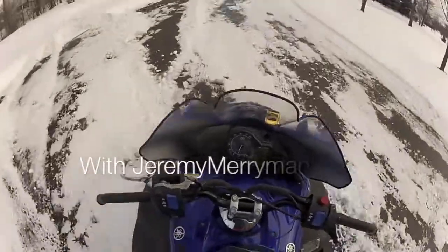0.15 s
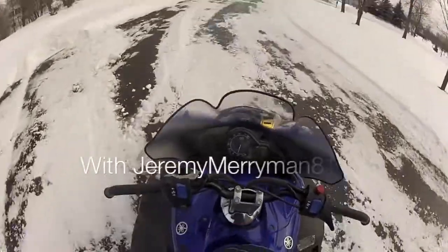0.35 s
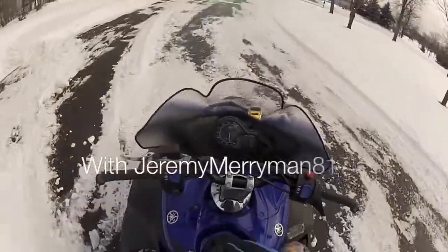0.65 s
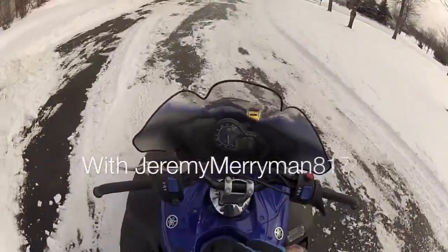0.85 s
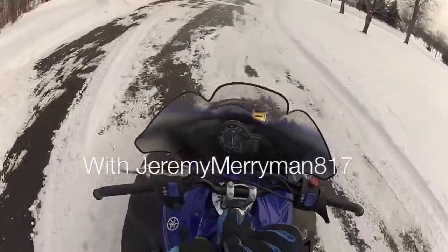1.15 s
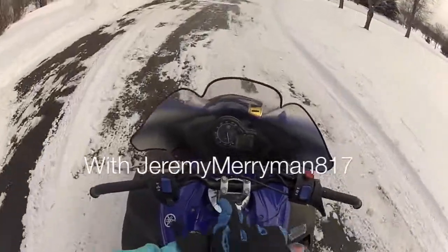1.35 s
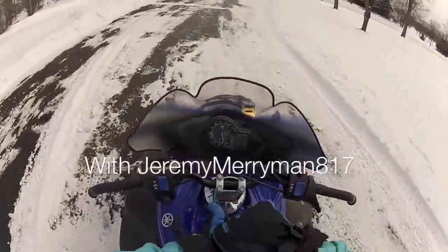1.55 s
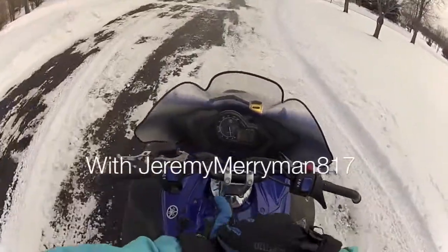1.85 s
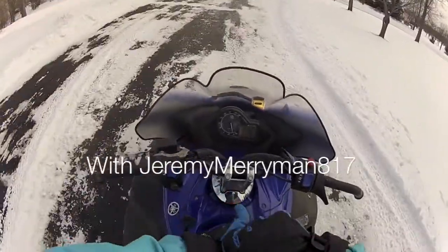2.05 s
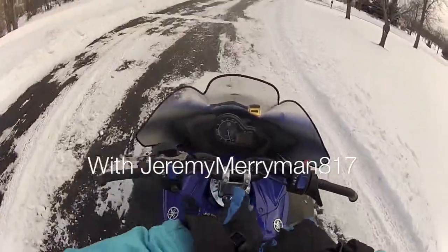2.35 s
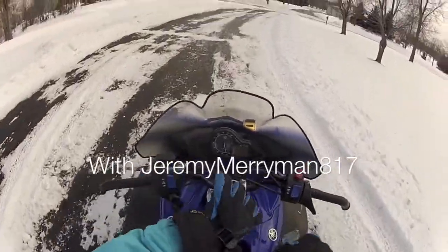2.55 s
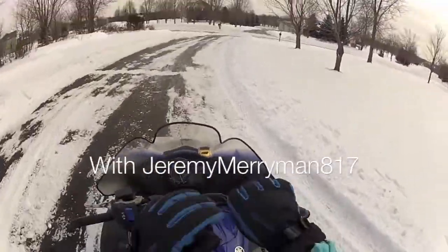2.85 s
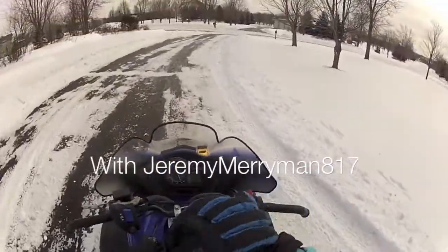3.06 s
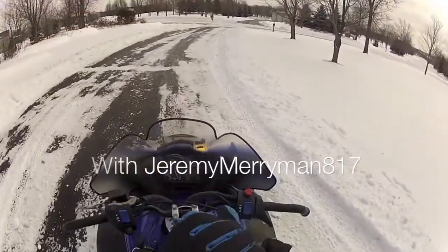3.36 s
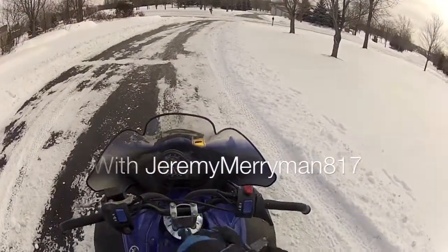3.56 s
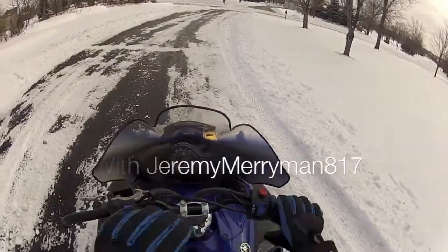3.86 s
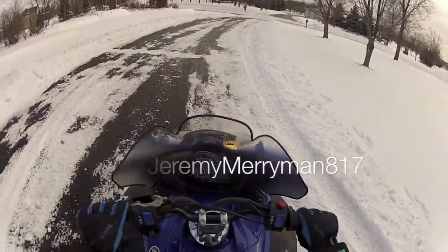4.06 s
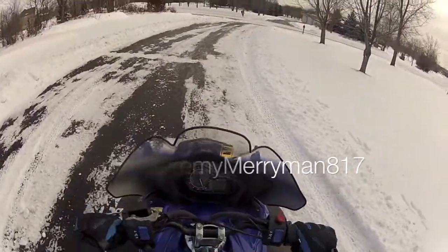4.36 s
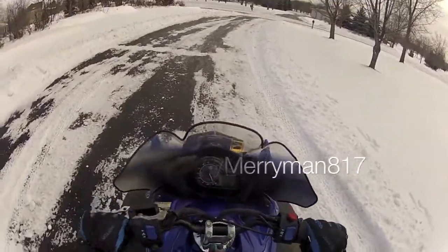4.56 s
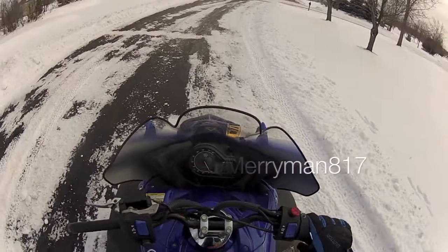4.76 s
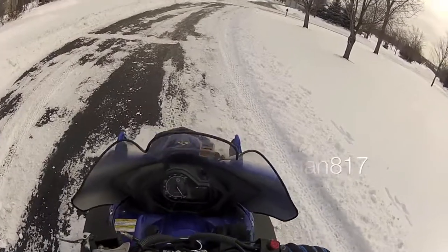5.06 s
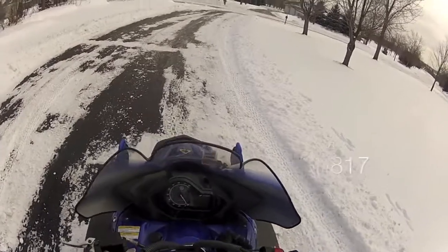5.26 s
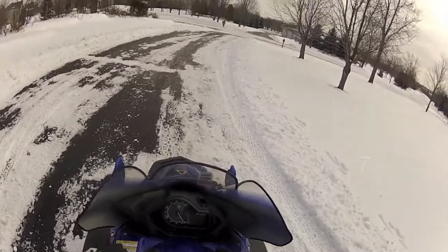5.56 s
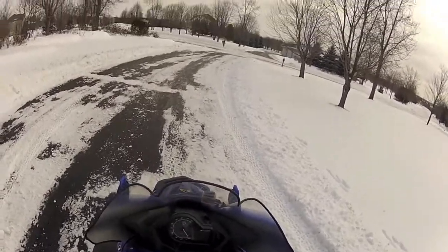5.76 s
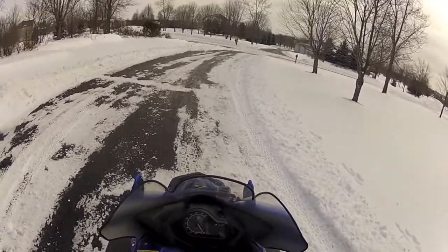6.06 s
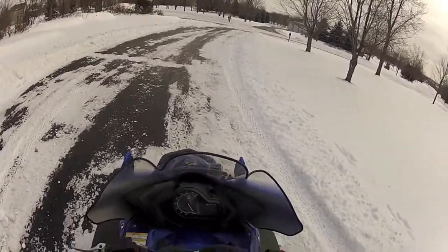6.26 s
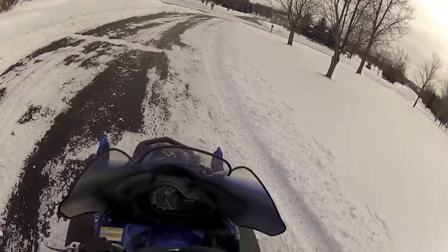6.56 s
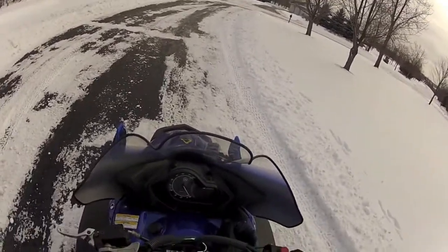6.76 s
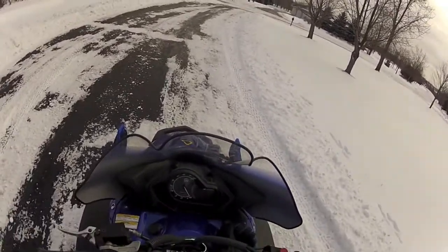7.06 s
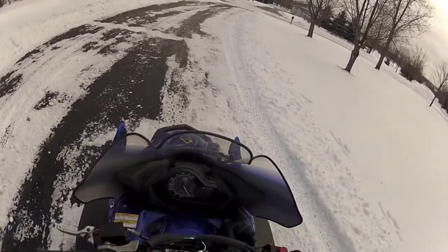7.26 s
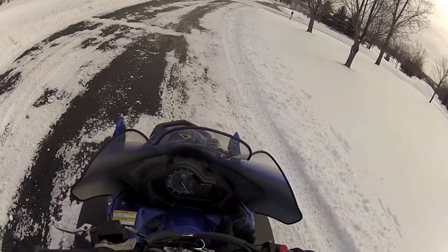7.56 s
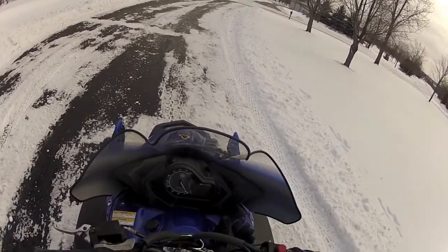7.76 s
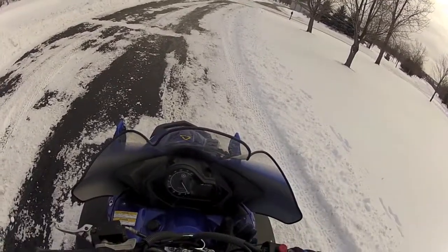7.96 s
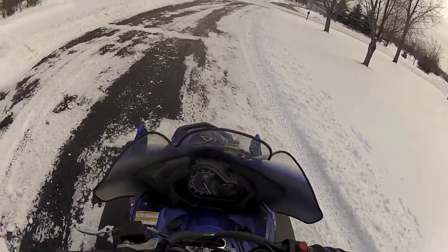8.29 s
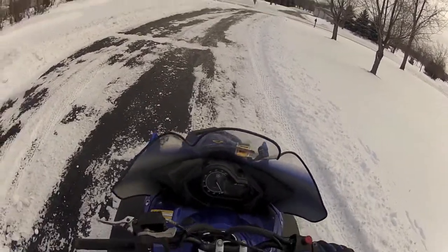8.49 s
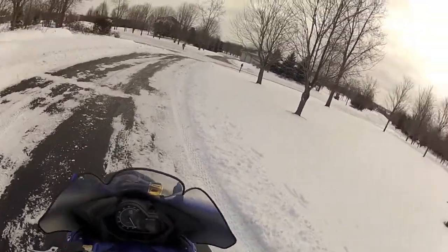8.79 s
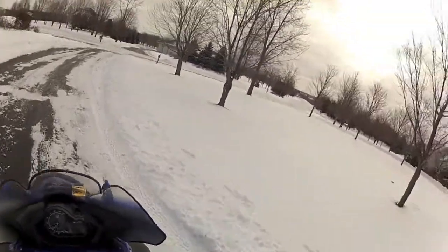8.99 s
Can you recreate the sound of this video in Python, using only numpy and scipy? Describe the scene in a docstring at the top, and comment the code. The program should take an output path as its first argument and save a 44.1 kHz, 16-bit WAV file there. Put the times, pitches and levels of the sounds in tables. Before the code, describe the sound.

Heard from the rider's seat, a snowmobile slows over icy snow, putters and rattles at idle, then accelerates with a rising buzz.

```python
"""A snowmobile coasts to a stop on icy snow, creeps at idle and pulls away, heard from the rider's helmet.
Firings of the four-stroke triple ring the exhaust, shake the chassis and rattle the drive under the hood.
The track crunches, runners rasp, gears whine, the belt grabs in fits, skis knock, a nylon sleeve swishes.
A low-rate sample-and-hold mirrors the rattle into a glassy treble."""
import sys
import numpy as np
from scipy import signal
from scipy.fft import rfft, irfft
from scipy.io import wavfile
from scipy.ndimage import uniform_filter1d

SR = 44100
rng = np.random.default_rng(int(sys.argv[2]) if len(sys.argv) > 2 else 0)


def to_wav(sig):
    """Store sig (one row per channel, or 1-D mono) as 16-bit WAV at the path in sys.argv[1].

    Samples outside -1..1 are clipped; the rate is SR.
    """
    pcm = np.clip(np.atleast_2d(sig), -1, 1) * 32767
    pcm = np.round(pcm).astype(np.int16)
    wavfile.write(sys.argv[1], SR, pcm.T)  # frames by channels


N = 402633
T = np.arange(N) / SR
BINS_HZ = np.maximum(np.arange(8193) * SR / 16384, 1)
SPROCKET_HZ = 318  # tooth rate at starting speed

# belt grabs: start_s, length_s, level_db, scrape_rel_db
BELT_GRABS = [(4.187, 0.008, -43.5, -7), (4.242, 0.006, -44.5, -5), (4.313, 0.043, -43, -10),
              (5.46, 0.053, -46, -5), (5.541, 0.026, -45.5, -11), (5.59, 0.011, -42, -8.5),
              (5.617, .02, -47.5, -7), (5.652, 0.0086, -41.5, -16), (5.685, 0.017, -45.5, -8.5),
              (5.728, 0.0073, -42.5, -9), (5.782, .009, -44, -8), (5.843, 0.019, -44.5, -6.5),
              (5.929, 0.04, -43, -6.5), (6.088, 0.027, -45, -11), (6.803, .05, -48.5, -3.5),
              (6.897, 0.018, -45, -9.5), (6.945, 0.01, -43, -9), (6.976, 0.012, -43, -10),
              (7.015, 0.0098, -48, -2.5), (7.062, .0055, -47.5, 2.5), (7.105, 0.012, -48.5, -1),
              (7.167, .011, -54.5, 6), (7.241, 0.038, -44.5, -4.5), (7.343, 0.011, -42.5, -5),
              (7.423, 0.032, -43.5, -3.5), (7.528, 0.044, -43, -5), (7.601, 0.022, -43.5, -12)]
# hood and clutch cover modes: centre_hz, width_hz, gain_db
HOOD_MODES = [(636, 190, -16), (930, 66, -4), (1190, 119, 6), (1313, 172, 1.5), (1625, 37, 3),
              (1908, 195, 4), (2260, 42, 1.5), (2810, 156, -3), (3140, 210, -16), (3740, 230, -16.5),
              (4720, 130, -20.5)]
# friction spectrum of snow, belt and nylon: freq_hz, gain_db
FRICTION_SPECTRUM = [(400, -14.5), (700, -12.5), (950, -11), (1250, -2), (1550, -4.5), (2050, -1),
                     (2500, -10), (3000, -3), (3700, -12.5), (4400, -24.5), (5400, -17.5), (5900, -33)]


def exhaust_note(firings, firing_hz, throttle, waver_db=2.06, level_db=-40.5):
    """Three unequal cylinders sound the pipe: firing orders, plus thirds that grow at high revs."""
    # pipe response: freq_hz, gain_db
    pipe_spectrum = [(35, -47), (75, 21.5), (97, 7), (130, 11), (192, -48), (226, 9), (290, 12), (340, 5.5),
                     (395, 9.5), (455, -5), (484, -3.5), (515, -16), (581, 3), (680, -17), (870, -24.5),
                     (968, -9), (1100, -53)]
    thirds = undb(np.interp(firing_hz, [75, 95], [-15, -7]))
    note, power = 0, 0
    for k in range(3, 33):
        gain = spectrum(pipe_spectrum, k * firing_hz / 3) * (thirds if k % 3 else 1)
        partial = np.sin(2 * np.pi * (k * firings / 3 + rng.random()))
        note += gain * undb(waver_db * wander(22)) * partial
        power += gain ** 2 / 2
    return note / np.sqrt(power) * throttle * undb(level_db)


def exhaust_thud(firings, coasting, speed, idle_db=-61, coast_db=-54.5, speed_db=-45):
    """Weak uneven puffs boom in the muffler, harder while the sled pushes the engine."""
    # muffler modes: centre_hz, width_hz, gain_db
    muffler_modes = [(24, 4.3, -9), (57.2, 15, -6.5), (75.36, 8.4, 1)]
    puffs = unit_rms(clicks(firings) * undb(4.5 * wander(31)))
    gas = 0.99 * rng.standard_normal(N)
    boom = ring(puffs + gas, resonances(muffler_modes))
    boom /= np.sqrt(uniform_filter1d(boom ** 2, size=6000))
    drive = power_sum(undb(idle_db), coasting * undb(coast_db), speed * undb(speed_db), surge("boom"))
    return boom * drive


def chassis(firings, firing_hz, speed, throttle, grip):
    """Firings shake tunnel and panels into a drone, more with speed, throttle and belt pull."""
    # panel response: freq_hz, gain_db
    panel_spectrum = [(30, -39.5), (70, -10.5), (110, -1.5), (150, 5), (240, 3), (350, 1), (400, -6.5),
                      (590, -8.5), (690, -17), (1000, -14.5), (2500, -54)]
    pulses = firing_pulses(firings, firing_hz, decay_s=0.027, scatter_db=-1.5, steady=1)
    shake = rng.standard_normal(N) * pulses
    drive = power_sum(undb(-63), speed * undb(-41), throttle * undb(-50), grip * undb(-14),
                      surge("drone"))
    return ring(shake, spectrum(panel_spectrum)) * drive


def clutch_rattle(firings, firing_hz, coasting, speed, throttle):
    """Clutch slack clatters once a firing and rings the hood; at speed it blurs into a whir."""
    clatter = power_sum(coasting ** 3 * undb(-54.5), surge("rattle"))
    clatter *= firing_pulses(firings, firing_hz, decay_s=0.005, scatter_db=0.3, steady=0.2)
    whir = power_sum(speed ** 1.96 * undb(-47), undb(-68))
    whir *= firing_pulses(firings, firing_hz, decay_s=0.0036, scatter_db=4, steady=1)
    pull = throttle * undb(-48)
    pull *= firing_pulses(firings, firing_hz, decay_s=0.006, scatter_db=2.2, steady=0.55)
    return ring(grit(spread_db=4) * power_sum(clatter, whir, pull), resonances(HOOD_MODES))


def track(speed, throttle, speed_db=-48, throttle_db=-51, hum_db=-49, tunnel_hz=182, width_hz=75):
    """Lugs crunch on packed snow; the sprocket hum falls, loudest at the tunnel resonance."""
    teeth = sprocket_teeth(speed, stray=0.0043)
    drive = power_sum(speed ** 1.65 * undb(speed_db), throttle * undb(throttle_db))
    grains = grit(spread_db=-0.5) * undb(2 * wander(130))
    crunch = ring(grains * drive, spectrum(FRICTION_SPECTRUM))
    hum = unit_rms(np.sin(2 * np.pi * teeth) * undb(0.37 * wander(20)))
    detuning = 2 * (SPROCKET_HZ * speed - tunnel_hz) / width_hz
    return crunch + hum * undb(hum_db) / (1 + detuning ** 4)


def runners(speed, rasp_db=-49, lug_db=-56):
    """Runners and rails rasp on icy pavement; uneven lugs ring them, slower as the sled slows."""
    # steel runner and slide rail modes: centre_hz, width_hz, gain_db
    rail_modes = [(450, 23.3, 12), (795, 35, 1), (1140, 59, 2.5), (1316, 49, 10), (2723, 390, -8.5),
                  (3388, 48, -2.5), (3906, 200, -7.5), (4530, 300, -15.5)]
    rasp = grit(spread_db=4) * undb(rasp_db)
    lugs = clicks(sprocket_teeth(speed, stray=0.016)) * undb(lug_db)
    return ring((rasp + lugs) * speed ** 1.75, resonances(rail_modes))


def transmission(firings, firing_hz, throttle, buzz_db=-52, rush_db=-48):
    """Under throttle each firing tugs the belt, which buzzes and rushes in its housing."""
    # loaded belt housing modes: centre_hz, width_hz, gain_db
    housing_modes = [(1340, 420, 5), (1910, 450, 6), (2200, 290, -5), (2790, 170, 0)]
    buzz = clicks(firings) * undb(buzz_db)
    rush = grit(spread_db=0.5) * undb(rush_db)
    rush *= firing_pulses(firings, firing_hz, decay_s=0.0036, scatter_db=3, steady=0.37)
    return ring((buzz + rush) * throttle, resonances(housing_modes))


def belt_chatter(grip, hood_db=-4.5, thump_db=-15, shiver_db=-15, settle_s=0.2):
    """Each belt grab scrapes, rings the hood, thumps the frame and leaves the cover shivering."""
    shiver = power_sum(*(undb(db + shiver_db) * burst(start_s, length_s, length_s, settle_s)
                         for start_s, length_s, db, _ in BELT_GRABS))
    slip = sum(undb(db + scrape_db) * grab(start_s, length_s)
               for start_s, length_s, db, scrape_db in BELT_GRABS)
    hood = ring(grit(spread_db=3) * power_sum(grip, shiver), resonances(HOOD_MODES))
    scrape = ring(grit(spread_db=2) * slip, spectrum(FRICTION_SPECTRUM))
    thump = ring(rng.standard_normal(N) * grip, resonances([(146, 14.5, 0)]))
    return hood * undb(hood_db) + scrape + thump * undb(thump_db)


def clutch_growl(start_s=8.26, length_s=0.07, level_db=-44):
    """The frame growls as the clutch closes on the belt."""
    judder = rng.standard_normal(N) * burst(start_s, length_s, rise_s=0.027, release_s=0.04)
    return ring(judder, resonances([(165, 25, 0)])) * undb(level_db)


def knocks():
    """Ski and handlebar blows ring the hood, with a hard tick and a hollow body."""
    # blows: start_s, length_s, level_db, tick_rel_db, body_rel_db
    blows = [(0.246, 0.0027, -48, -30, -5), (1.312, 0.017, -44, -36, -25), (1.635, 0.0067, -45, -28, -16),
             (1.721, 0.011, -48, -28, -17), (2.55, .01, -46.5, -32, -20), (2.677, 0.0092, -46.5, -34, -4.5),
             (2.768, 0.0076, -43.5, -32, -17), (4.884, .003, -56, 9.5, 1), (4.939, 0.0027, -39, -16, -12),
             (5.053, 0.0037, -53, 6, -8), (5.063, .005, -46, -5, -11), (6.279, 0.0016, -38.5, -13, -9.5),
             (6.326, .006, -52.5, -22, -7), (6.346, 0.0035, -61, 4, -18), (7.727, 0.01, -44.5, -28, -24)]
    # hard contact: freq_hz, gain_db
    tick_spectrum = [(1500, -22), (2300, 10), (4200, -1.5), (5200, 10), (5900, 2)]
    hood_force, tick_force, body_force = np.zeros((3, N))
    for start_s, length_s, db, tick_db, body_db in blows:
        force = undb(db) * burst(start_s, length_s, rise_s=0.00067, release_s=0.0035)
        hood_force += force
        tick_force += force * undb(tick_db)
        body_force += force * undb(body_db)
    hood = ring(rng.standard_normal(N) * hood_force, resonances(HOOD_MODES))
    tick = ring(rng.standard_normal(N) * tick_force, spectrum(tick_spectrum))
    body = ring(rng.standard_normal(N) * body_force, resonances([(620, 350, 0)]))
    return hood + tick + body


def sleeve(width_hz=150, whistle_db=-7, rustle_db=-2, trim_db=-3.5):
    """Nylon slides on nylon: the weave sings in blurred partials that follow arm speed."""
    # swishes: start_s, gain_db
    swishes = [(5.192, 0), (6.54, -0.5)]
    # one arm stroke: offset_s, weave_hz, whistle_hz, gain_db
    stroke = [(0, 650, 3280, -64), (.07, 640, 3000, -55.5), (.113, 740, 3480, -56.5),
              (.145, 670, 3200, -53.5), (.178, 612, 2840, -49.5), (.2, 610, 3420, -58),
              (.228, 620, 3830, -62)]
    cloth = 0
    for start_s, gain_db in swishes:
        path = [(start_s + offset_s, *rest) for offset_s, *rest in stroke]
        weave = sum(undb(db) * blurred_tone(k * curve(path), width_hz)
                    for k, db in [(1, -8), (2, 0), (3, -6)])
        whistle = undb(whistle_db) * blurred_tone(curve(path, column=2), width_hz)
        rustle = undb(rustle_db) * ring(rng.standard_normal(N), spectrum(FRICTION_SPECTRUM))
        cloth += undb(gain_db) * swell(path, column=3, fade_s=0.002) * (weave + whistle + rustle)
    return cloth * undb(trim_db)


def whines(width_hz=170, trim_db=-2.5):
    """Rough gliding tones: gears whine down, the belt squeals, the drive whines up."""
    # glides: start_s, length_s, from_hz, to_hz, from_db, to_db
    glides = [(0, .9, 970, 666, -50, -65), (0, .6, 2900, 2450, -51, -66), (0, .9, 3980, 3250, -57, -70),
              (5.86, .07, 3660, 3400, -62, -63), (8.6, .53, 1640, 1808, -59, -43)]
    tones = 0
    for start_s, length_s, from_hz, to_hz, from_db, to_db in glides:
        path = [(start_s, from_hz, from_db), (start_s + length_s, to_hz, to_db)]
        tones += swell(path, column=2, fade_s=0.013) * blurred_tone(curve(path), width_hz)
    return tones * undb(trim_db)


def slack_belt(idle_db=-73, surge_db=-10):
    """The loose belt brushes the spinning clutch, more when the engine surges."""
    drive = power_sum(undb(idle_db), surge("rattle") * undb(surge_db))
    brush = grit(spread_db=6.5) * undb(1.8 * wander(6.7)) * drive
    return ring(brush, resonances([(560, 220, 0), (2100, 1000, -1.7), (3290, 430, -0.5)]))


def motion(slowing_s=1.9, stop_s=4.17, stop_fade_s=0.1):
    """Control curves: coasting gate, share of starting speed, throttle, belt grip."""
    # throttle squeezes: start_s, length_s, gain_db
    squeezes = [(7.57, .1, -11), (7.73, .21, -2), (8.047, 1.1, -1)]
    coasting = np.exp(-np.maximum(T - stop_s, 0) / stop_fade_s)
    speed = coasting * np.exp(-T / slowing_s)
    throttle = power_sum(*(undb(db) * burst(start_s, length_s, rise_s=0.038, release_s=0.18)
                           for start_s, length_s, db in squeezes))
    grip = sum(undb(db) * grab(start_s, length_s) for start_s, length_s, db, _ in BELT_GRABS)
    return coasting, speed, throttle, grip


def surge(layer):
    """Gain of one layer as the engine surges under load."""
    # surges: peak_s, rise_s, fall_s, boom_db, drone_db, rattle_db
    surges = [(2.36, 0.036, 0.015, -60, -65, -50), (2.92, 0.073, 0.12, -44.5, -56, -60),
              (3.54, .025, 0.026, -60, -56, -52), (3.96, 0.044, 0.033, -58, -50.5, -51),
              (4.111, 0.037, 0.05, -45, -49, -46), (4.94, 0.12, 0.076, -47, -75, -55.5),
              (5.629, 0.091, 0.14, -43, -55, -55.5), (6.38, 0.15, .05, -60, -81, -66),
              (6.96, 0.12, 0.25, -44.5, -56.5, -53.5), (7.69, 0.058, 0.22, -40, -58, -53.5),
              (8.29, 0.1, 0.049, -47, -48, -54)]
    column = ["boom", "drone", "rattle"].index(layer)
    return sum(undb(db[column]) * np.exp(-np.maximum((peak_s - T) / rise_s, (T - peak_s) / fall_s))
               for peak_s, rise_s, fall_s, *db in surges)


def firing_pulses(firings, firing_hz, decay_s, scatter_db, steady, rise_s=0.0039):
    """Gain that jumps unevenly at each firing and sinks to a steady share; rms 1."""
    strength = undb(scatter_db * np.clip(rng.standard_normal(2000), -2, 2))
    age_s = (firings % 1) / firing_hz
    pulse = np.minimum(age_s / rise_s, 1) * np.exp(-age_s / decay_s)
    gain = steady + strength[firings.astype(int)] * pulse
    return gain / np.sqrt(uniform_filter1d(gain ** 2, size=16000))


def grab(start_s, length_s, bite_s=0.0041):
    """Envelope of one belt grab: sharp bite, weaker slip, release."""
    bite = 1 + 0.23 * np.exp(-np.abs(T - start_s) / bite_s)
    return burst(start_s, length_s, rise_s=0.0046, release_s=0.013) * bite


def sprocket_teeth(speed, stray):
    """Running tooth count; the rate follows sled speed."""
    return np.cumsum(SPROCKET_HZ * speed * (1 + stray * wander(23.7))) / SR


def clicks(cycles):
    """One click per cycle, rms 1."""
    return unit_rms(np.diff(np.floor(cycles), prepend=np.floor(cycles[0])))


def grit(spread_db):
    """Dense tiny impacts of unequal size."""
    return unit_rms(rng.standard_normal(N) * undb(spread_db * np.minimum(rng.exponential(size=N), 5)))


def blurred_tone(pitch_hz, width_hz):
    """A tone whose strength and phase stray, filling a narrow band."""
    phase = 2 * np.pi * np.cumsum(pitch_hz) / SR
    return unit_rms(wander(width_hz) * np.sin(phase) + wander(width_hz) * np.cos(phase))


def wander(rate_hz):
    """Smooth random curve, rms 1."""
    hold = max(int(SR / rate_hz), 1)
    steps = np.repeat(rng.standard_normal(N // hold + 1), hold)
    return unit_rms(uniform_filter1d(uniform_filter1d(steps, hold), hold)[:N])


def ring(x, gain):
    """Pass x through a minimum-phase body of this spectral shape and unit energy."""
    cepstrum = irfft(np.log(gain + 1e-6))
    half = len(cepstrum) // 2
    cepstrum[1:half] *= 2
    cepstrum[half + 1:] = 0
    response = irfft(np.exp(rfft(cepstrum)))
    return signal.fftconvolve(x, response / np.linalg.norm(response))[:N]


def resonances(modes):
    """Gain of steep-sided modes: centre_hz, width_hz, gain_db."""
    return np.sqrt(sum(undb(2 * db) / (1 + ((BINS_HZ / hz - hz / BINS_HZ) * hz / width_hz) ** 2) ** 1.5
                       for hz, width_hz, db in modes))


def spectrum(points, at_hz=BINS_HZ):
    """Gain interpolated over log frequency."""
    freq_hz, gain_db = np.transpose(points)
    return undb(np.interp(np.log(at_hz), np.log(freq_hz), gain_db))


def burst(start_s, length_s, rise_s, release_s):
    """Attack, hold, release."""
    attack = np.clip((T - start_s) / rise_s, 0, 1)
    return attack * np.exp(-np.maximum(T - start_s - length_s, 0) / release_s)


def swell(rows, column, fade_s):
    """A dB column as gain, fading outside its rows."""
    outside_s = np.maximum(np.maximum(rows[0][0] - T, T - rows[-1][0]), 0)
    return undb(curve(rows, column)) * np.exp(-outside_s / fade_s)


def curve(rows, column=1):
    """One column, interpolated in time."""
    rows = np.array(rows)
    return np.interp(T, rows[:, 0], rows[:, column])


def power_sum(*gains):
    """Unrelated causes add in power."""
    return np.sqrt(sum(gain ** 2 for gain in gains))


def unit_rms(x):
    return x / np.sqrt(np.mean(x ** 2))


def undb(db):
    return 10 ** (np.asarray(db) / 20)


def scene():
    """All sources close to one microphone; no echo over the snow."""
    # engine idling: time_s, firing_hz
    idle = [(0, 26.8), (.4, 27.53), (.8, 27.87), (1.2, 23.96), (1.5, 27.19), (1.8, 29.75), (2.1, 28.35),
            (2.4, 28.83), (2.7, 28.3), (3.0, 27.68), (3.3, 27.81), (3.6, 27.43), (3.9, 28.33), (4.15, 29)]
    # engine pulling away: time_s, firing_hz
    revs = [(7.55, 28.26), (7.62, 33.2), (7.76, 39.2), (7.82, 51.8), (7.91, 66.9), (8.0, 68.06),
            (8.08, 65.66), (8.2, 83.04), (8.27, 97.8), (8.3, 97.9), (8.37, 93.75), (8.55, 97), (8.8, 96.3),
            (9.13, 98.04)]
    coasting, speed, throttle, grip = motion()
    firing_hz = curve(list(idle) + list(revs))
    firings = np.cumsum(firing_hz * (1 + 0.0014 * wander(30))) / SR
    exhaust = exhaust_note(firings, firing_hz, throttle) + exhaust_thud(firings, coasting, speed)
    drone = chassis(firings, firing_hz, speed, throttle, grip)
    rattle = clutch_rattle(firings, firing_hz, coasting, speed, throttle)
    running_gear = track(speed, throttle) + runners(speed) + whines()
    drive = transmission(firings, firing_hz, throttle) + belt_chatter(grip)
    drive += slack_belt() + clutch_growl()
    return np.tile(exhaust + drone + rattle + running_gear + drive + knocks() + sleeve(), (2, 1))


def record(dry):
    """A slow sample-and-hold mirrors the sound about its sample rate; the top is cut."""
    hold_hz, antialias_hz, top_hz = 12000, 5800, 15500
    mic = dry + undb(-68) * rng.standard_normal(N)  # preamp hiss
    filtered = signal.sosfilt(signal.ellip(8, 0.3, 60, antialias_hz, fs=SR, output="sos"), mic)
    slow = signal.resample_poly(filtered, hold_hz, SR, axis=1, window=("kaiser", 3))
    held = signal.resample_poly(np.repeat(slow, 4, axis=1), SR, 4 * hold_hz, axis=1)[:, :N]
    held += undb(-89) * rng.standard_normal((2, N))  # per-channel hiss
    return signal.sosfilt(signal.ellip(10, 0.2, 70, top_hz, fs=SR, output="sos"), held)


dry = scene()
out = record(dry)
to_wav(out)
```